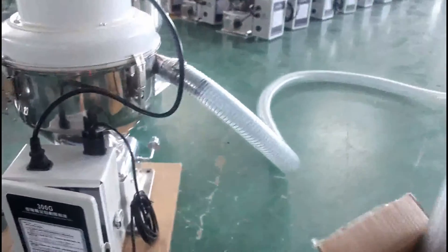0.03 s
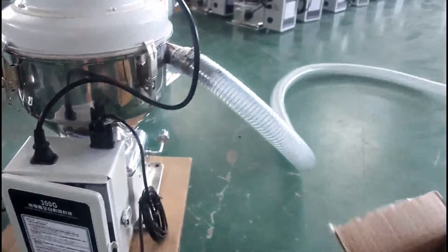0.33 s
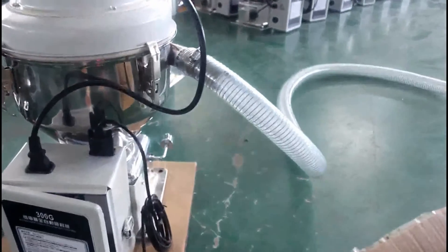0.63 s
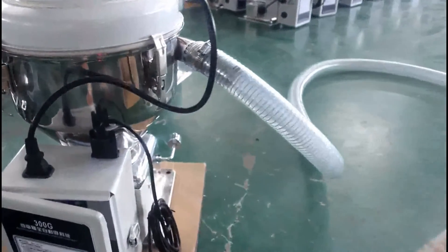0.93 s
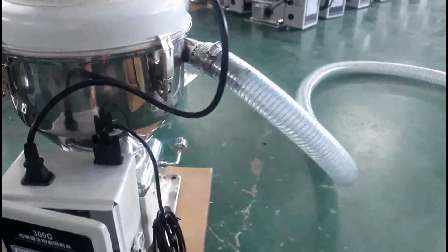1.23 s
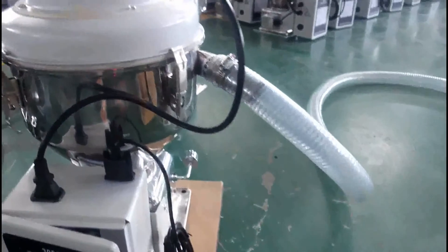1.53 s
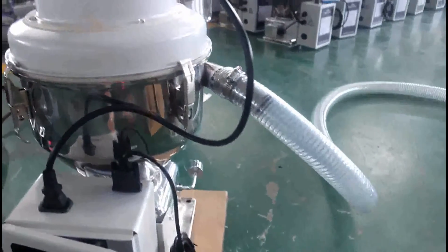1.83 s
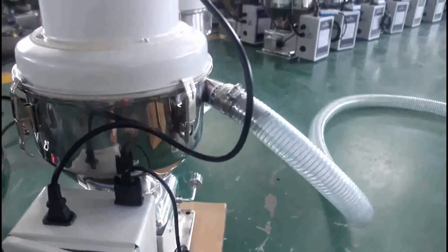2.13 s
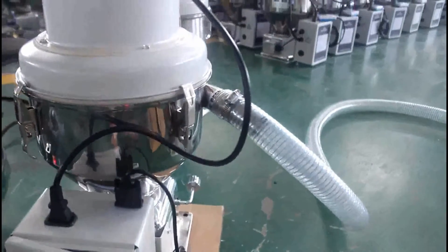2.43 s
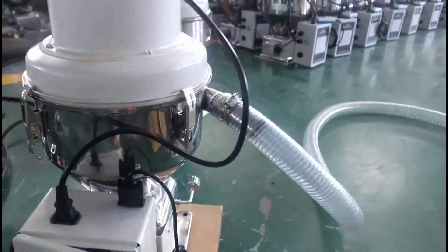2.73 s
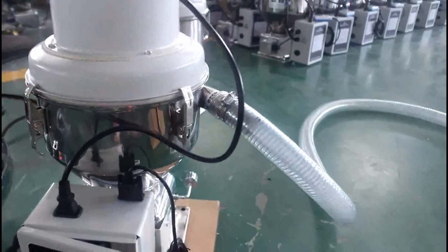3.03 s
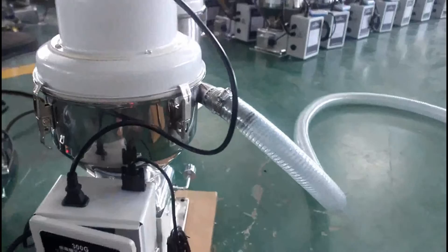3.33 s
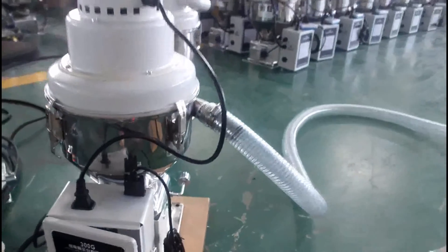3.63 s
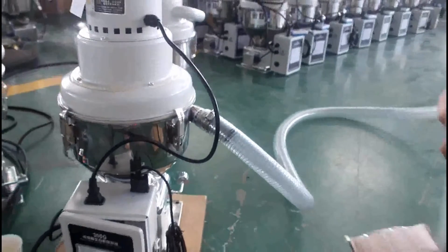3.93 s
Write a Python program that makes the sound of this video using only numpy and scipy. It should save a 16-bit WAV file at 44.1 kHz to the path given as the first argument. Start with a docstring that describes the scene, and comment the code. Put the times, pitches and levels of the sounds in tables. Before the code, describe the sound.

Air sucked through a vacuum loader's hose hisses loudly and steadily for all four seconds, close up in a factory hall, over faint motor tones. At the start something rubs and snaps by the microphone, then rubs on more softly. A high, breathy whistle sinks slightly over the first second, then wavers. Around 2 seconds a hand bumps the microphone with several dull thuds; lighter bumps follow until the end.

```python
"""A factory hall, with a hand-held microphone close to a vacuum loader. From the start, air sucked
through a ribbed hose hisses loudly with fixed resonances, over faint motor tones. At once something,
probably a sleeve or cardboard, rubs and snaps by the microphone, then rubs on more softly. Over the
first second the hose's breathy whistle sinks, then wavers. Around two seconds in, the hand bumps
the microphone's case hardest; lighter bumps follow while the hiss carries on to the end."""
import sys
import numpy as np
from scipy import signal
from scipy.fft import rfft, irfft, next_fast_len
from scipy.io import wavfile
from scipy.ndimage import map_coordinates

SR = 44100
rng = np.random.default_rng(int(sys.argv[2]) if len(sys.argv) > 2 else 0)


def to_wav(s):
    """Save 16-bit WAV."""
    ch = np.atleast_2d(s).T  # columns
    pcm = np.round(np.clip(ch, -1, 1) * 32767)  # PCM
    wavfile.write(sys.argv[1], SR, pcm.astype(np.int16))


N = 176400


def amp(db):
    """Decibels to gain."""
    return 10 ** (np.asarray(db) / 20)


def unit(x):
    """x at rms 1."""
    return x / np.sqrt(np.mean(x ** 2) + 1e-20)


def along(points, hz):
    """(Hz, value) points read on a log axis."""
    f, v = np.transpose(points)
    return np.interp(np.log(hz + 1), np.log(f + 1), v)


def curve(rows):
    """(s, value) rows as one value per sample."""
    return np.interp(np.arange(N) / SR, *np.transpose(rows))


def wobble(rate):
    """A smooth random curve, rate knots a second."""
    return map_coordinates(rng.standard_normal(N // 8), [np.arange(N) * rate / SR], mode="wrap")


def filtered(x, response):
    """x through a gain that depends on frequency."""
    size = next_fast_len(N + SR // 2)
    return irfft(rfft(x, size) * response(np.fft.rfftfreq(size, 1 / SR)), size)[..., :N]


def noise(colour_db):
    """Noise of rms 1 with a spectrum in dB."""
    return unit(filtered(rng.standard_normal(N), lambda hz: amp(colour_db(hz))))


def fuzzy_tone(pitch_hz, width_hz):
    """A narrow band of noise that follows a pitch."""
    a, b = filtered(rng.standard_normal((2, N)), lambda hz: 1 / (1 + (hz / width_hz) ** 2) ** 2)
    phase = 2 * np.pi * np.cumsum(pitch_hz * np.ones(N)) / SR
    return unit(a * np.cos(phase) + b * np.sin(phase))


# Ring of the hall. Each row: frequency in Hz, seconds to fall by 60 dB.
HALL_DECAY = [(150, 3.6), (2000, 1.54), (10000, 0.17)]

def hall(x):
    """The diffuse answer from the far walls; the treble dies first."""
    hz, t, spectrum = signal.stft(rng.standard_normal(SR), SR, nperseg=256)
    decay = amp(-60 * t / along(HALL_DECAY, hz)[:, None])
    tail = signal.istft(spectrum * decay, SR, nperseg=256)[1]
    return signal.fftconvolve(x, tail / np.linalg.norm(tail))[:N]


# Tones of the motor and its housing. Each row: pitch in Hz, level in dB.
MOTOR_TONES = [(312, -56.5), (515, -62), (1340, -51.5), (1550, -60), (2056, -60), (2845, -56)]

def motor():
    """The loader's motor: unsteady tones, nearly buried in the hiss even this close."""
    return sum(amp(db) * fuzzy_tone(hz, width_hz=17) for hz, db in MOTOR_TONES)


# Course of the rumble and of the scuffing. Each row: time in seconds, relative level in dB.
RUMBLE_LEVEL = [(0.0, -51), (0.07, -40), (0.24, -43.5), (0.66, -41.5), (0.73, -52.5), (1.1, -48),
                (1.16, -74), (1.3, -47.5), (1.59, -46.5), (1.86, -32.5), (1.92, -35), (2.07, -40),
                (2.14, -46.5), (3.16, -42), (3.45, -55), (3.58, -43.5), (3.9, -39.5), (3.92, -30),
                (3.95, -51), (4.0, -36)]
SCUFF_LEVEL = [(0, -58), (.05, -27), (.13, -30.5), (.2, -52), (.4, -45), (.45, -36.5), (.63, -37),
               (.69, -53.5), (1.64, -55), (1.79, -37.5), (2.02, -42), (2.15, -48.5), (2.9, -48),
               (3.0, -36.5), (3.35, -63), (3.65, -43.5), (4, -43)]
# Their spectra. Each row: frequency in Hz, relative density in dB.
RUMBLE_SPECTRUM = [(20, -13), (50, -8), (88, 2), (170, 0), (300, -10), (450, -17), (1000, -34), (3000, -64)]
SCUFF_SPECTRUM = [(40, -31), (120, -18.5), (175, 1.5), (290, -2), (400, -9.5), (600, -4), (850, -18.5),
                  (2000, -32), (6000, -61)]

def handling():
    """The hand shifts on the microphone's case: a lumpy rumble and dull scuffs."""
    def lumpy(spectrum, lumps_db=3):
        return unit(noise(lambda hz: along(spectrum, hz)) * amp(lumps_db * wobble(60)))

    rumble = lumpy(RUMBLE_SPECTRUM) * amp(curve(RUMBLE_LEVEL) - 2)
    scuffs = lumpy(SCUFF_SPECTRUM) * amp(curve(SCUFF_LEVEL))
    return rumble + scuffs


# Bumps on the case. Each row: start in seconds, level in dB, pitch of the thud in Hz.
CASE_BUMPS = [(.662, -38, 85), (1.774, -25.5, 120), (1.829, -20, 170), (1.856, -25, 136), (2.078, -17, 253),
              (2.21, -33, 90), (2.585, -31, 110), (2.775, -28, 160), (3.14, -32, 120), (3.258, -31, 110),
              (3.918, -35, 130)]

def bumps(rise_cycles=0.45, knock_hz=440, knock_db=-7, knock_t60_s=0.035):
    """The hand bumps the microphone's case: each heavily damped thud comes with a short knock."""
    out = np.zeros(N)
    t = np.arange(SR // 20) / SR
    knock = amp(knock_db - 60 * t / knock_t60_s) * np.sin(2 * np.pi * knock_hz * t)
    for start, db, hz in CASE_BUMPS:
        rise = t * hz / rise_cycles
        envelope = (rise * np.exp(1 - rise)) ** 2
        thud = envelope * np.sin(2 * np.pi * hz * t)
        out[round(start * SR):][:len(t)] += amp(db) * (thud + knock)
    return out


# Course of the rubbing. Each row: time in seconds, level in dB before its swings are widened.
RUB_LEVEL = [(0, -21.5), (.025, -25), (.05, -18.5), (.08, -23.5), (.12, -21.5), (.165, -26.5), (.26, -33),
             (.45, -30.5), (.62, -32), (.8, -33.5), (1.1, -36.5), (1.22, -34), (1.34, -30), (1.62, -40),
             (1.72, -31.5), (2.04, -26.5), (2.16, -30), (2.33, -32.5), (2.41, -29), (2.48, -26.5),
             (2.55, -35), (2.85, -34), (2.98, -29.5), (3.22, -30), (3.4, -37), (3.68, -29.5), (3.85, -31),
             (4, -38.5)]
# Snaps within it. Each row: start in seconds, relative level in dB.
RUB_SNAPS = [(0.0522, -19), (.0605, -17), (.072, -8), (.129, -15)]
# Colour of both. Each row: frequency in Hz, relative gain in dB.
RUB_SPECTRUM = [(80, -12.5), (250, -2.5), (400, -5), (620, -1), (900, -5), (1400, -0.5), (2100, 0.5),
                (2600, -0.5), (3200, -1), (4500, -4.5), (7000, -9.5), (10400, -13)]

def rubbing(pivot_db=-25, widen=1.31, gain_db=2, snap_t60_s=0.002):
    """Rough sliding friction right by the microphone, with a few snaps where it catches."""
    level_db = pivot_db + widen * (curve(RUB_LEVEL) - pivot_db)
    slips = unit(rng.standard_normal(N) * amp(wobble(260) + 1.26 * wobble(35.19)))
    force = slips * amp(level_db + gain_db)
    t = np.arange(SR // 50) / SR
    for start, db in RUB_SNAPS:
        snap = amp(db - 60 * t / snap_t60_s) * rng.standard_normal(len(t)) / 2
        force[round(start * SR):][:len(t)] += snap
    return filtered(force, lambda hz: unit(amp(along(RUB_SPECTRUM, hz))))


# The hose's note. Each row: time in seconds, pitch in Hz, level in dB.
HOSE_NOTE = [(0, 4060, -31), (.25, 3950, -38), (.42, 3860, -36), (.68, 3780, -36), (1.1, 3730, -49),
             (1.5, 3800, -38), (1.75, 3700, -47), (2.2, 3750, -36), (2.9, 3725, -54), (2.96, 3716, -37.5),
             (3.15, 3720, -39), (3.38, 3655, -40.5), (3.82, 3712, -40.5), (4, 3720, -44)]
# The breathy band around it. Each row: time in seconds, relative level in dB.
BREATH_LEVEL = [(0.0, -31), (0.3, -35), (0.61, -31.5), (1.07, -33.5), (1.08, -43), (1.15, -31.5),
                (1.29, -49), (1.37, -29), (1.78, -35.5), (2.03, -28.5), (2.32, -39), (2.48, -35),
                (2.83, -31), (3.13, -33), (3.41, -44.5), (3.84, -32), (3.98, -39), (4.0, -25)]

def hose_whistle():
    """The nearby hose sings a narrow, slowly sinking note inside a wide, airy band."""
    times, hz, db = np.transpose(HOSE_NOTE)
    pitch_hz = curve(np.c_[times, hz])
    note = amp(curve(np.c_[times, db])) * fuzzy_tone(pitch_hz, width_hz=68)
    breath = amp(curve(BREATH_LEVEL) - 4) * fuzzy_tone(pitch_hz=3640, width_hz=570)
    return note + breath


# The hiss at the microphone. Each row: time in seconds, relative level in dB.
HISS_LEVEL = [(0.0, -29.5), (0.05, -27.5), (0.11, -29), (0.12, -23.5), (0.48, -26), (0.69, -24.5),
              (0.92, -26), (0.98, -24.5), (1.15, -30.5), (1.19, -24), (1.22, -30.5), (1.29, -29.5),
              (1.37, -24.5), (1.88, -28), (1.89, -24.5), (2.03, -27), (2.1, -24), (2.14, -25),
              (2.19, -23.5), (2.21, -25.5), (2.41, -27.5), (2.49, -24.5), (2.82, -26), (2.91, -27.5),
              (3.01, -25.5), (3.03, -26), (3.2, -24), (3.53, -27), (3.58, -25), (4.0, -26.5)]
# Spectrum of the rushing air. Each row: frequency in Hz, relative density in dB.
AIR_SPECTRUM = [(60, -15.5), (120, -21), (300, -11), (800, -8.5), (1400, -6.5), (2200, -3.5), (2600, -10.5),
                (3300, -1), (4400, 0), (5800, 3.5), (7100, 0.5), (9000, 0), (10400, 0)]
# Resonances of the air path. Each row: centre in Hz, width in Hz, lift in dB (a dip if negative).
DUCT_RESONANCES = [(312, 40, 5), (515, 60, 3.5), (1007, 49, 8), (1310, 97, 6.5), (1482, 42, 4.5),
                   (1900, 70, -0.5), (2830, 49, 11), (4650, 120, -1.5), (5186, 180, 5), (5840, 100, 1),
                   (6170, 150, 2.5), (6430, 290, 3.5), (6680, 260, 5.5), (7500, 190, 4.5), (8500, 370, 4.5),
                   (9630, 150, 5), (10050, 130, 6.5)]

def rushing_air(flutter_db=0.63, edge_db=-13.5, surge_db=0.5):
    """Turbulent air from close by, coloured by hose and housing, with a shrill, surging edge tone."""
    def colour_db(hz):
        lifts = (db / (1 + (2 * (hz - centre) / width) ** 2) for centre, width, db in DUCT_RESONANCES)
        return along(AIR_SPECTRUM, hz) + sum(lifts)

    edge_tone = amp(edge_db + surge_db * wobble(14)) * fuzzy_tone(pitch_hz=6490, width_hz=270)
    hiss = noise(colour_db) + edge_tone
    return hiss * amp(curve(HISS_LEVEL) + flutter_db * wobble(34.08))


def scene():
    """The loader close up, the hall behind it and the hand at the microphone, almost mono."""
    loader = amp(3.5) * rushing_air() + hose_whistle() + motor()
    near = rubbing() + handling() + bumps()
    mid = loader + amp(-10) * hall(loader) + near
    side = amp(-49.5) * hall(loader + near)
    return np.array([mid + side, mid - side])


def record(dry):
    """The recorder keeps nothing above its band limit."""
    top_hz = 10530
    return filtered(dry, lambda hz: hz < top_hz)


dry = scene()
out = record(dry)
to_wav(out)
```